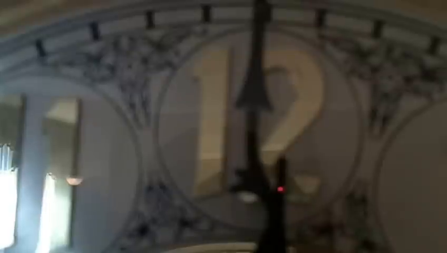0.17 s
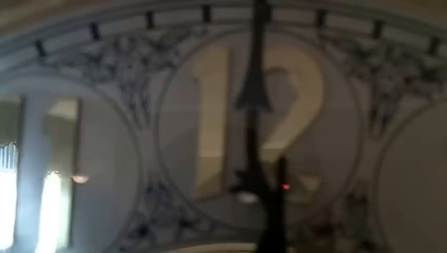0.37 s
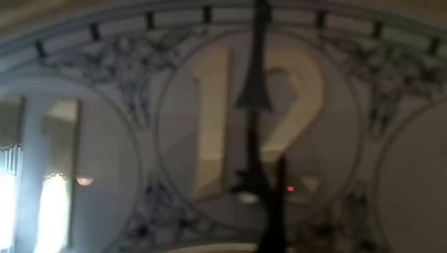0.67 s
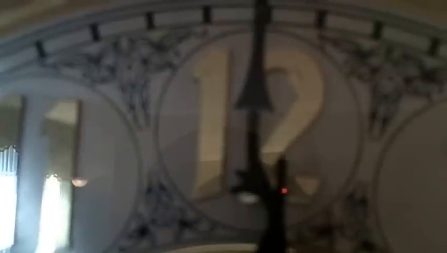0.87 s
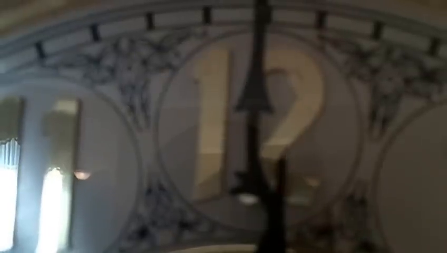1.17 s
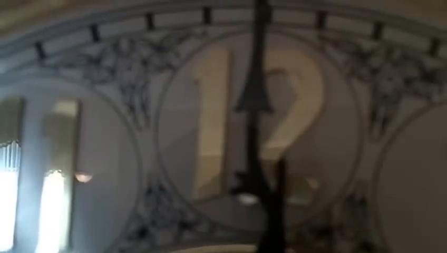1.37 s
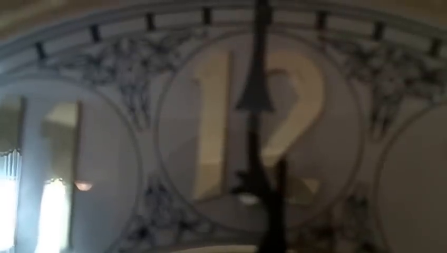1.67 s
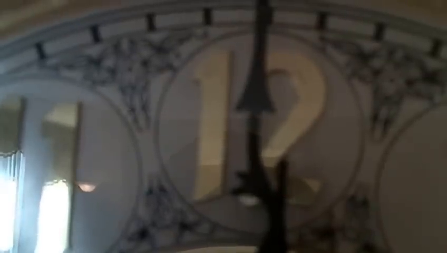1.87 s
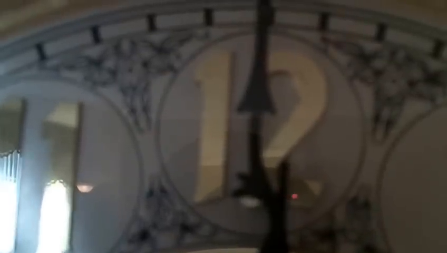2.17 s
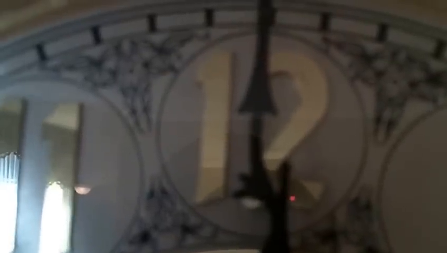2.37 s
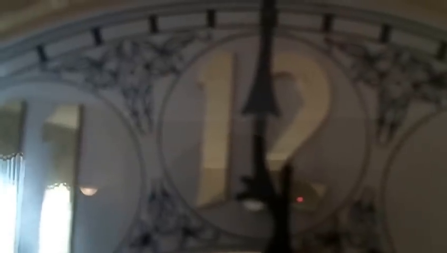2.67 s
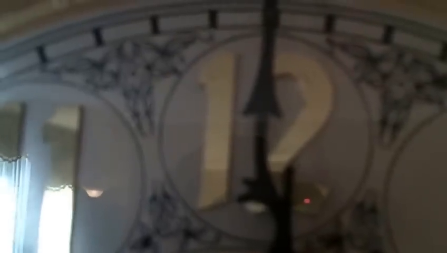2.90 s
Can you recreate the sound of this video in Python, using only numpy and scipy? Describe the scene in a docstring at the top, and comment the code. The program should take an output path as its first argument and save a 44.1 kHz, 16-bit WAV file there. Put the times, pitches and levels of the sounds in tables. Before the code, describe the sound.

A large pendulum clock ticks slowly, close to a mono camera microphone in a quiet room. A bright metallic tick lands at about 0.7 seconds, a duller, softer tock at 1.7, and another bright tick with a sharper high ping at 2.7. Each is a quick clattering contact with short brassy ringing. Low household rumble, wavering hum, faint hiss and a thin buzz continue throughout.

```python
"""Grandfather clock in a quiet room

A clock beats about once a second, close to a camera: a bright tick, a duller tock, a tick.
Each beat is ringing modes of the brass movement plus noise bursts for the clatter of wheels and case.
Behind it: household machines (shaped-noise rumble, wavering hum tones) and the camera's electronics
(shaped-noise hiss, a thin buzz of ringing pulses)."""
import sys
import numpy as np
from scipy import signal
from scipy.fft import rfft, irfft
from scipy.io import wavfile

SR = 44100
rng = np.random.default_rng(int(sys.argv[2]) if len(sys.argv) > 2 else 0)


def persist_wave(psi):
    """Save psi, clipped to +-1, as 16-bit WAV."""
    counts = np.round(np.clip(psi, -1, 1) * 32767).astype(np.int16)
    wavfile.write(sys.argv[1], SR, np.atleast_2d(counts).T)


N = 134064


def amp(db):
    """Decibels to gain."""
    return 10 ** (np.asarray(db) / 20)


def add(mix, start_s, sound):
    """Mixes a sound in at start_s, cut at the end of the mix."""
    part = mix[max(round(start_s * SR), 0):][:len(sound)]
    part += sound[:len(part)]


def noise(spectrum, size):
    """Gaussian noise shaped to (frequency [Hz], density [dB per Hz]), interpolated over log frequency."""
    hz, db = np.transpose(spectrum)
    bin_hz = np.fft.rfftfreq(size, 1 / SR)
    gain = amp(np.interp(np.log(bin_hz + 1), np.log(hz), db))  # + 1 avoids log(0)
    white = rng.standard_normal(size)
    return irfft(rfft(white) * gain, size) * np.sqrt(SR / 2)  # white density to 1 per Hz


def fade(t, t60_s):
    """Free exponential decay, 60 dB down after t60_s."""
    return np.exp(-np.log(1000) * t / t60_s)


def drift(rate_hz):
    """Slow random wandering of rms 1: Gaussian low-passed noise."""
    hz = np.fft.rfftfreq(N, 1 / SR)
    lowpass = np.exp(-(hz / rate_hz) ** 2)
    slow = irfft(rfft(rng.standard_normal(N)) * lowpass, N)
    return slow / slow.std()


def rumble():
    """Low broadband noise of household machines and room air."""
    # (frequency [Hz], density [dB per Hz])
    rumble_spectrum = [(8, -86), (25, -67.5), (42, -66), (58, -73.5), (100, -74.5), (150, -81.5),
                       (200, -79), (270, -82), (370, -80), (465, -75.5), (530, -81), (620, -86), (720, -90),
                       (900, -95.5), (1200, -102), (2500, -118), (6000, -145)]
    return noise(rumble_spectrum, N)


def hum():
    """Steady machine tones; a complex random sway wavers each in level and phase."""
    # machine tones: (frequency [Hz], rms level [dB], waver share [-])
    tones = [(17.4, -54.5, 0.37), (29.55, -49.5, 0.14), (57.56, -58.5, 0.18), (120.16, -49.6, 0.14),
             (173, -63.5, 0.76), (267.7, -61, 0.31), (535.5, -56, 0.14)]
    waver_hz = 3.4
    t = np.arange(N) / SR
    out = np.zeros(N)
    for hz, rms_db, waver in tones:
        sway = 1 + waver * (drift(waver_hz) + 1j * drift(waver_hz))
        sway /= np.sqrt(np.mean(abs(sway) ** 2))
        carrier = np.exp(2j * np.pi * (hz * t + rng.random()))
        out += amp(rms_db) * np.sqrt(2) * (sway * carrier).real
    return out


def hiss():
    """Broadband noise of the microphone electronics."""
    # (frequency [Hz], density [dB per Hz])
    hiss_spectrum = [(500, -104), (1500, -101.5), (2100, -103), (3300, -105), (4050, -105), (4850, -106),
                     (5400, -115), (6200, -120), (8500, -122), (10000, -120), (12500, -118.3),
                     (15000, -118)]
    return noise(hiss_spectrum, N)


def buzz():
    """Camera electronics: one tiny ringing pulse per picture field, alternating in sign."""
    # rings of a pulse: (frequency [Hz], level before the rise [dB], t60 [s])
    rings = [(6666, -52.5, 0.0042), (6150, -54.5, 0.0032)]
    field_hz, first_field_s, rise_s = 59.94, 0.0549, 0.00037
    field, since_s = np.divmod(np.arange(N) / SR - first_field_s, 1 / field_hz)
    pulses = np.zeros(N)
    for hz, db, t60_s in rings:
        pulses += amp(db) * fade(since_s, t60_s) * np.sin(2 * np.pi * hz * since_s)
    sign = np.cos(np.pi * field)
    return sign * pulses * (1 - np.exp(-since_s / rise_s))


def brass(t, ping_db, is_tock):
    """Movement modes swell and ring out, each beating against a weaker close partner."""
    # modes: (frequency [Hz], tick base level [dB], tock base level [dB], t60 [s], swell time constant [s])
    modes = [(780, -63, -70, .28, .007), (1072, -68, -59, .17, .004), (1256, -70, -63, .15, .004),
             (1532, -63, -74, .12, .007), (1747, -69, -59, .18, .012), (1837, -62, -74, .3, .008),
             (2012, -55.5, -63, .21, .002), (2141, -53, -53, .13, .007), (3167, -59, -82, .2, .0015),
             (3487, -61, -80, .17, .005), (3662, -62, -68, .14, .004), (4590, -65, -70, .14, .007),
             (4734, -63, -74, .15, .006), (4968, -53.5, -82, .075, .012), (6058, -69, -92, .085, .003)]
    ping_above_hz = 4850  # ping_db lifts the highest modes, which vary from tooth to tooth
    partner_gain, max_split_hz = 0.75, 35
    out = np.zeros(len(t))
    for hz, tick_db, tock_db, t60_s, swell_s in modes:
        turns, partner_turns, split = rng.uniform(-0.92, 1, 3)
        partner_hz = hz + split * max_split_hz
        pair = np.sin(2 * np.pi * (hz * t + turns))
        pair += partner_gain * np.sin(2 * np.pi * (partner_hz * t + partner_turns))
        db = tock_db if is_tock else tick_db
        if hz > ping_above_hz:
            db = db + ping_db
        out += amp(db) * pair * fade(t, t60_s) * (1 - np.exp(-t / swell_s))
    return out


def clatter(t, attack_s, is_tock):
    """The tooth lands, then rebounds: each contact briefly rattles wheels and case, with a faint room tail."""
    # contacts in a beat: (delay [s], relative level [dB])
    contacts = [(0, 4), (.009, 0.5), (.019, -2.5)]
    # wheels and case: (frequency [Hz], tick base density [dB per Hz], tock base density [dB per Hz])
    clatter_spectra = [(295, -106, -99), (750, -81.5, -98), (1080, -91.5, -86), (1410, -95.5, -96),
                       (2060, -79.5, -86), (2630, -99, -100), (3050, -79.5, -102), (3650, -87.5, -96),
                       (4240, -95, -103), (4870, -83.5, -94.5), (5900, -105, -117), (6400, -102, -118),
                       (7400, -116, -128), (9700, -108, -126), (10800, -115, -128), (12400, -110, -128),
                       (15400, -122, -135)]
    case_t60_s = 0.075
    room_db, room_t60_s, room_rise_s = -8.5, 0.35, 0.017
    rattle_db, rattle_hz = 2.5, 132  # uneven small rattles in the decay
    spectrum = [(hz, tock_db if is_tock else tick_db) for hz, tick_db, tock_db in clatter_spectra]
    room_rise = np.minimum(t / room_rise_s, 1)
    case = np.minimum(t / attack_s, 1) * fade(t, case_t60_s)
    room = amp(room_db) * room_rise * fade(t, room_t60_s)
    envelope = np.hypot(case, room)  # power sum
    out = np.zeros(len(t))
    for delay_s, db in contacts:
        add(out, delay_s, amp(db) * envelope * noise(spectrum, len(t)))
    return out * amp(rattle_db * drift(rattle_hz)[:len(t)] * room_rise)


def clock():
    """Escapement: the escape wheel lands on the two pallets in turn, tick and tock."""
    # beats: (time [s], clatter level [dB], ring level [dB], extra ping of this tooth [dB],
    #         attack [s], pallet [0 tick, 1 tock])
    beats = [(0.7393, -0.37, -0.37, -2, 0.0022, 0), (1.7197, -1, 0.12, 0, 0.0042, 1),
             (2.7389, -2.1, -0.13, 11, 0.0029, 0)]
    t = np.arange(SR // 2) / SR
    out = np.zeros(N)
    for beat_s, clatter_db, ring_db, ping_db, attack_s, pallet in beats:
        is_tock = round(pallet) == 1
        ring = amp(ring_db) * brass(t, ping_db, is_tock)
        rattle = amp(clatter_db) * clatter(t, attack_s, is_tock)
        add(out, beat_s, ring + rattle)
    return out


def scene():
    """The clock over room noise and the camera's own noise, one channel."""
    return (rumble() + hum() + hiss() + buzz() + clock())[None]


def record(dry):
    """The recorder cuts four notches and limits the band; after a short silence the sound fades in quickly, and
    it fades out quickly at the very end."""
    # notch filters: (centre [Hz], width [Hz], gain at centre [dB])
    notches = [(2728, 910, -26), (5460, 1220, -12.5), (7910, 1140, -34), (10990, 840, -19)]
    start_s, fade_in_s, fade_out_s, edge_hz = 0.035, 0.001, 0.003, 15300
    out = dry
    for hz, width_hz, depth_db in notches:
        b, a = signal.iirnotch(hz, hz / width_hz, SR)
        notched = signal.lfilter(b, a, out)
        out = notched + amp(depth_db) * (out - notched)  # partial depth
    end_s = N / SR
    corners_s = [start_s, start_s + fade_in_s, end_s - fade_out_s, end_s]
    out = out * np.interp(np.arange(N) / SR, corners_s, [0, 1, 1, 0])
    lowpass = signal.firwin(511, edge_hz, window=("kaiser", 9), fs=SR)
    return signal.oaconvolve(out, lowpass[None], "same")


dry = scene()
out = record(dry)
persist_wave(out)
```